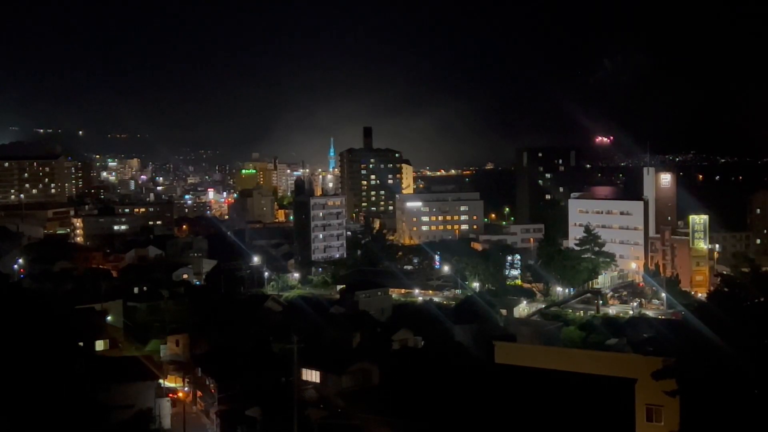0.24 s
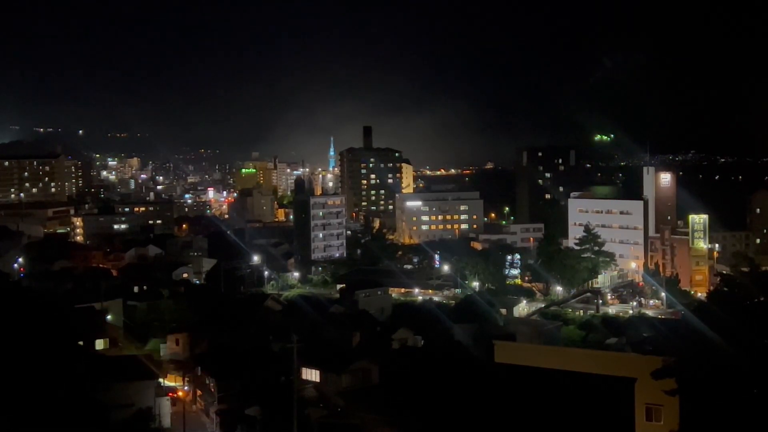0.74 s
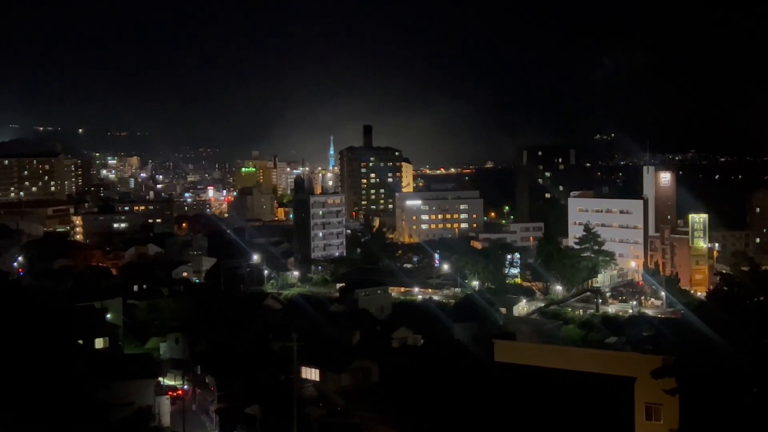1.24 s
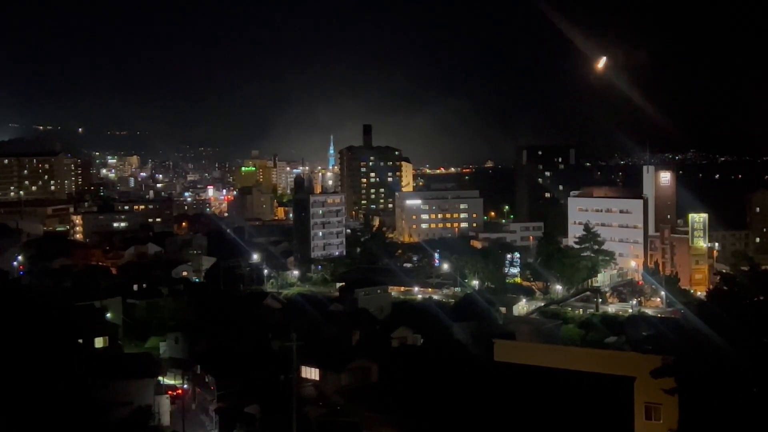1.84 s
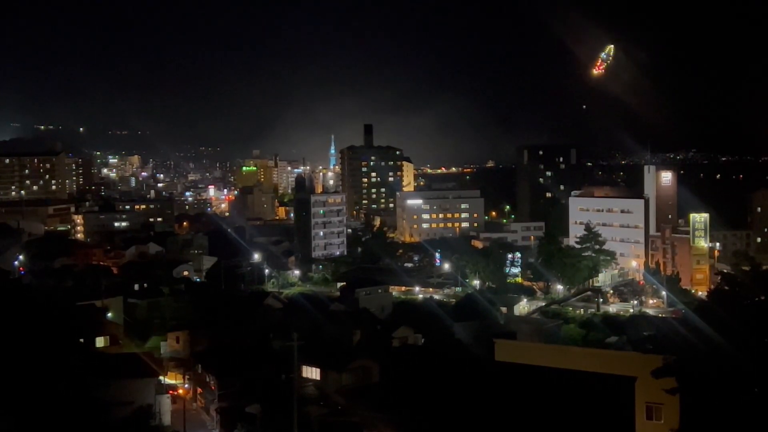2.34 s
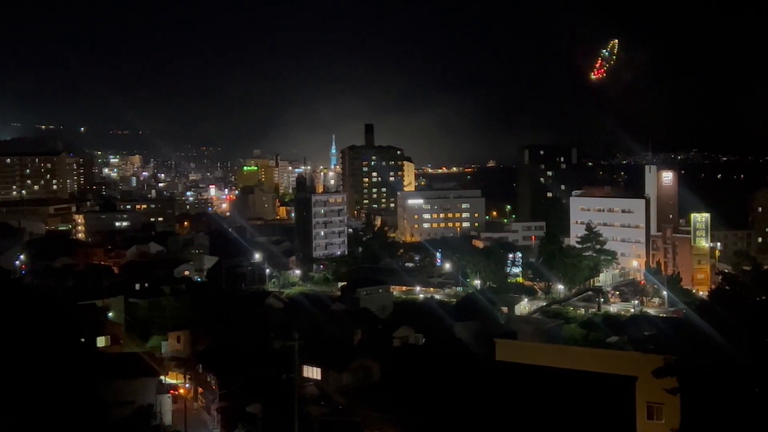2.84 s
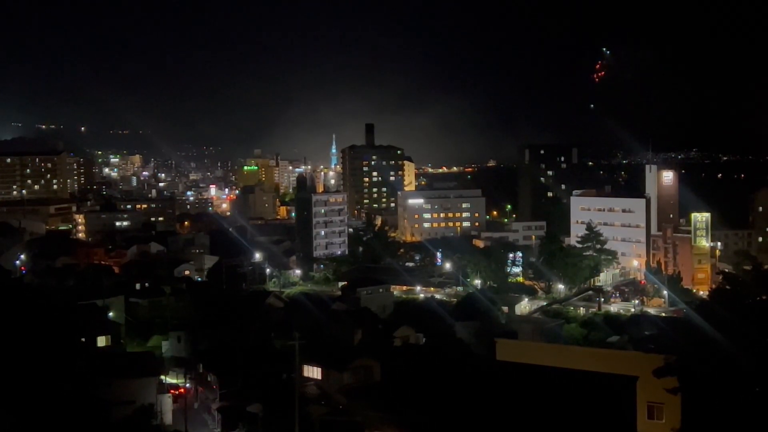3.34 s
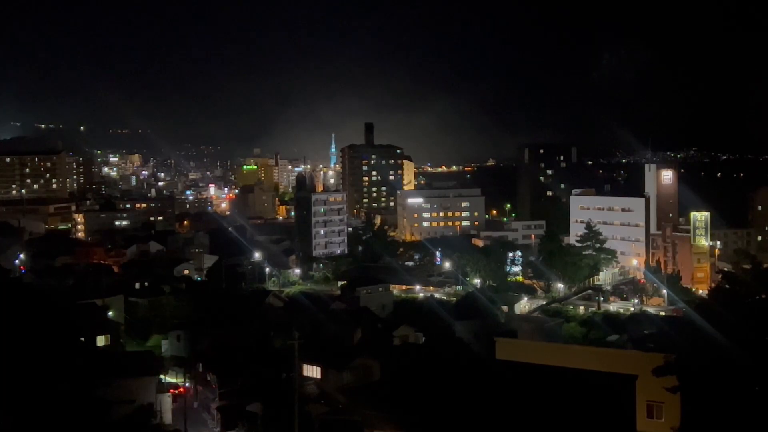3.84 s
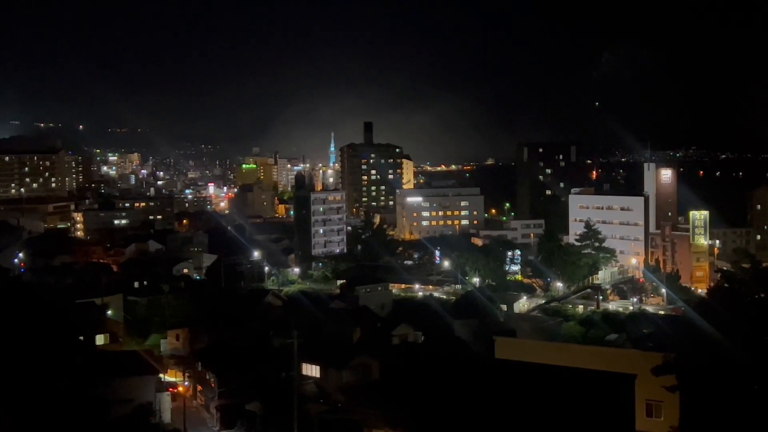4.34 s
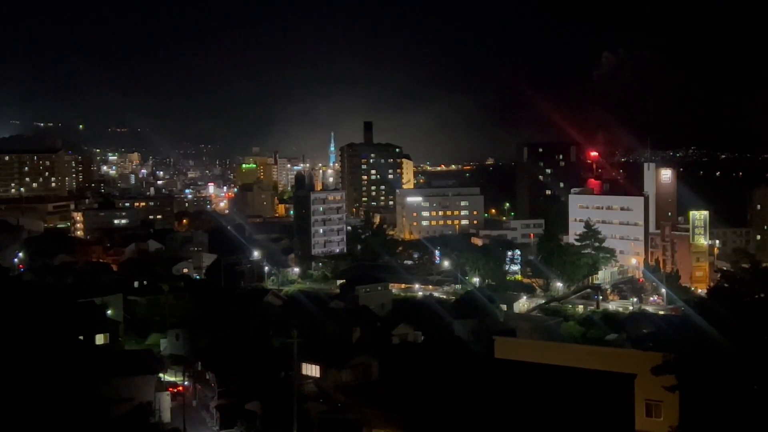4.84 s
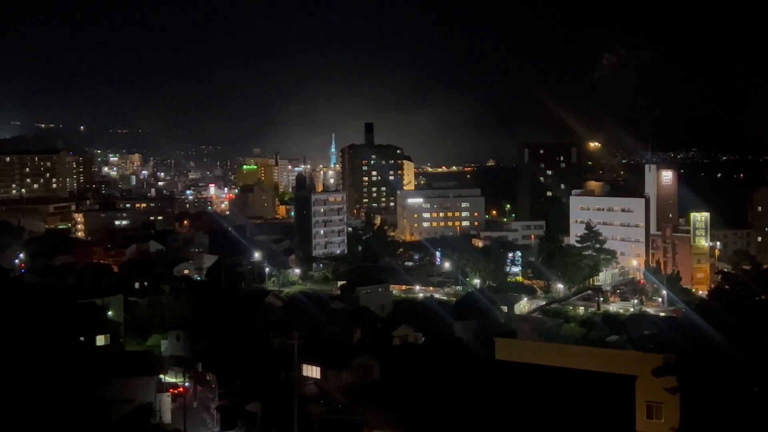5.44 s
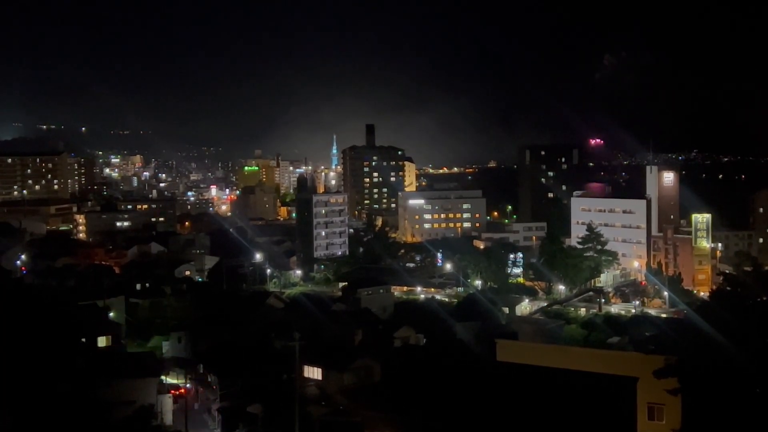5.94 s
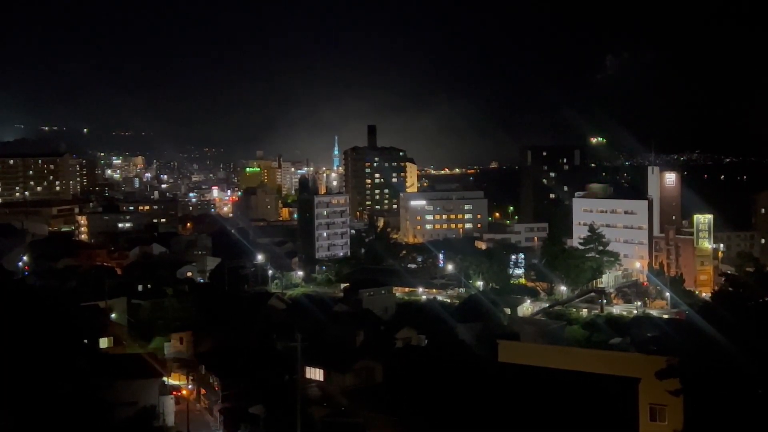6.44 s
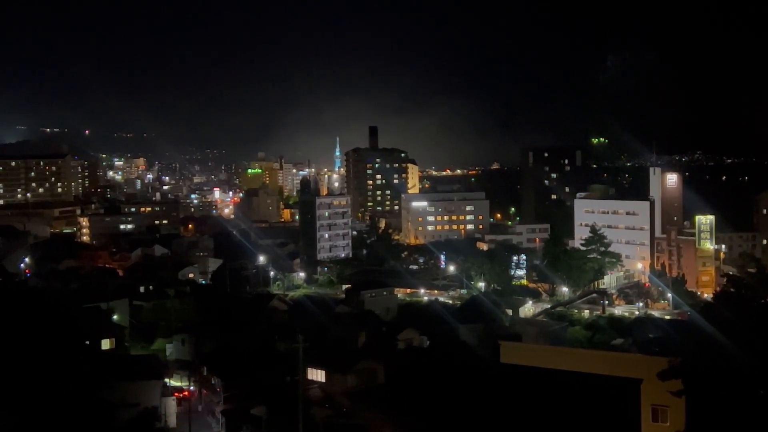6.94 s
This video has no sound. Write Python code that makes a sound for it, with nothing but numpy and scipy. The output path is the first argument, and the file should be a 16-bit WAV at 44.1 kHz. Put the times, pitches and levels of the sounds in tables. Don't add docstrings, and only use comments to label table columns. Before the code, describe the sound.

Two distant firework booms crack and roll in long echoes over a night city, above a steady katydid rasp, low hum and soft traffic.

```python
import sys
import numpy as np
from scipy import signal
from scipy.fft import rfft, irfft, next_fast_len
from scipy.io import wavfile
from scipy.ndimage import map_coordinates

SR = 44100
rng = np.random.default_rng(int(sys.argv[2]) if len(sys.argv) > 2 else 0)


def output_pcm(signal):
    pcm = np.clip(np.atleast_2d(signal).T, -1, 1) * 32767
    wavfile.write(sys.argv[1], SR, np.round(pcm).astype(np.int16))


def magnitude_from_level(level_db):
    exponent = np.asarray(level_db, float) / 20
    return 10 ** exponent


N = 317079
T = np.arange(N) / SR

# (time [s], peak [dB], length [ms], street ring [dB])
WALL_ECHOES = [(1.55, -38, 0.63, -9), (1.563, -33.5, 3.1, 14.5), (1.664, -35, 1.1, -15),
               (1.668, -33, 1.3, -9), (1.6708, -31, 3.3, 9), (1.6965, -30.5, 0.93, -9),
               (1.8768, -33, 0.62, -12), (1.9948, -38, 0.78, 11), (2.0968, -41, 0.44, -9),
               (2.1017, -34.5, 0.64, -7), (3.037, -42.5, 2.3, 9), (3.061, -39.5, 3, 4), (3.1, -38, 3.2, -1),
               (6.632, -31, .9, -10), (6.733, -32.5, 2.7, -6), (6.7679, -32, 0.57, 12),
               (7.156, -34, 0.67, -10), (7.1601, -31.5, 2.8, -2)]


def unit(x):
    return x / np.sqrt(np.mean(x ** 2) + 1e-20)


def curves(rows):
    s, *columns = np.transpose(rows)
    return [np.interp(T, s, column) for column in columns]


def wobble(rate):
    knots = rng.standard_normal(int(N * rate / SR) + 4)
    return map_coordinates(knots, [T * rate])


def filtered(x, response):
    m = next_fast_len(N + SR // 2)
    spectrum = rfft(x, m) * response(np.fft.rfftfreq(m, 1 / SR))
    return irfft(spectrum, m)[:N]


def coloured(x, points):
    hz, db = np.transpose(points)
    return unit(filtered(x, lambda f: magnitude_from_level(np.interp(np.log(f + 1), np.log(hz), db, -120, -120))))


def resonance(f, hz, width):
    return 1j * f * width / (hz * hz - f * f + 1j * f * width)


def grainy(spread_db, rate):
    return rng.standard_normal(N) * magnitude_from_level(spread_db * wobble(rate))


def dying(starts, t60):
    kicks = np.zeros(N)
    for s, db in starts:
        kicks[int(s * SR) + 1] += magnitude_from_level(2 * db)
    return signal.lfilter([1], [1, -magnitude_from_level(-120 / t60 / SR)], kicks)


def blasts():
    # (time [s], peak [dB], length [ms], rise [ms], street ring [dB])
    pushes = [
        (1.4333, -19, 12, .3, -20),
        (1.4421, -11.5, 7, 2.4, -10),
        (1.4498, -14.5, 6, 2, 0),
        (6.4881, -10.3, 4.6, .55, -20),
        (6.4948, -10, 3.6, 1.4, 3),
    ]
    # (time [s], peak [dB], length [ms], rise [ms])
    pulls = [
        (1.4306, -19, 7, 2.6),
        (1.4368, -24, 1.6, .3),
        (6.485, -14.5, 12, 1.5),
        (6.4875, -8.8, .65, .26),
        (6.4916, -23, .6, .25),
    ]
    # (frequency [Hz], width [Hz])
    street = (196, 33)
    ground_hz = 95
    air_hz = 4800

    fronts = [(1, *row) for row in pushes]
    fronts += [(-1, *row, -20) for row in pulls]
    for s, db, length, ring_db in WALL_ECHOES:
        rise = .42 * length ** 1.05
        fronts.append((1, s, db, length, rise, ring_db))

    push, boom = np.zeros(N + SR), np.zeros(N + SR)
    ms = np.arange(SR // 10) / SR * 1000
    for sign, s, db, length, rise, ring_db in fronts:
        front = (1 - ms / length) * np.exp(-ms / length) * (1 - np.exp(-(ms / rise) ** 2))
        front *= sign * magnitude_from_level(db) / front.max()
        first = round(s * SR)
        push[first:][:len(ms)] += front
        boom[first:][:len(ms)] += front * magnitude_from_level(ring_db)

    def path(f):
        air = 1 / (1 + 1.5j * f / air_hz - (f / air_hz) ** 2) ** 2
        ground = 1j * f / ground_hz * resonance(f, ground_hz, ground_hz * 1.2) / 1.2
        return air * ground

    ringing = filtered(boom[:N], lambda f: resonance(f, *street))
    return filtered(push[:N] + ringing, path)


def roll():
    # (time [s], near walls [dB], far city [dB], brightness [dB a layer])
    bursts = [
        (1.432, -24, -40.5, -1.5),
        (6.487, -21, -41.5, 1),
    ]
    # (near level [dB], near t60 [s], far level [dB], far t60 [s], build-up [s])
    layers = [
        (0.5, 0.23, -1, 4.34, 0.042),
        (7, 0.074, -10, 2.7, .027),
        (-18.5, 0.14, -15.5, 1.93, 0.0022),
        (-28, .06, -24, 0.68, 0.0027),
    ]
    # (frequency [Hz], level [dB])
    boom_tone = [(40, -39), (90, -5.5), (140, 2), (200, -1), (300, -11.5), (500, -16.5)]
    rattle_tone = [(200, -33), (350, 0.5), (500, 1), (800, -2.5), (1200, -10.5), (1800, -43)]
    hiss_tone = [(800, -12), (1300, 2.5), (2200, -6.5), (3300, -16.5), (4500, -36), (6000, -60)]
    crack_tone = [(1500, -25), (2500, 0), (4300, -5), (5500, -12), (6500, -48)]
    tones = boom_tone, rattle_tone, hiss_tone, crack_tone
    trails_db = -11.5, -21, -29, -47

    walls = [echo[:2] for echo in WALL_ECHOES]
    trail = abs(dying(walls, 0.14) - dying(walls, .02))
    out = np.zeros(N)
    for k, (tone, layer, trail_db) in enumerate(zip(tones, layers, trails_db)):
        near_db, near_s, far_db, far_s, build = layer
        power = dying([(s, near + near_db + k * bright) for s, near, far, bright in bursts], near_s)
        power += dying([(s, far + far_db + k * bright) for s, near, far, bright in bursts], far_s)
        power += trail * magnitude_from_level(2 * trail_db)
        for s, *_ in bursts:
            power *= np.where(T < s, 1, np.clip((T - s) / build, 0, 1) ** 4)
        out += np.sqrt(power) * coloured(grainy(spread_db=2.5, rate=90), tone)
    return out


def thuds():
    # (time [s], peak [dB], length [ms])
    mortars = [
        (2.124, -35, 12),
        (4.012, -39, 12),
    ]
    out = np.zeros(N)
    for s, db, ms in mortars:
        x = (T - s) * 2000 / ms - 1
        out -= magnitude_from_level(db) * (1 - x ** 2) * np.exp(-x ** 2 / 2)
    return out


def katydid():
    # (time [s], level [dB])
    song_levels = [(0, -57), (1, -57), (2, -57.5), (3, -58), (4, -58.5), (5, -58.5), (6, -58), (7.19, -57)]
    # (frequency [Hz], width [Hz], level [dB])
    wing_modes = [(8650, 550, 4), (9230, 430, 5), (9940, 870, 2), (11380, 1350, -6), (13000, 580, -8),
                  (13900, 480, -7), (15300, 1600, -11)]
    # (rest [dB], full at [share of stroke], held to [share],
    # sag [dB], let go at [share], level then [dB])
    low_stroke = (-16, 0.41, .57, -3.5, 0.61, -6)
    high_stroke = (-13.5, .39, .63, -4, .69, -12.5)

    share = (.13 + 26.105 * T - .0215 * T ** 2 / 2 + .025 * wobble(4.8)) % 1
    vigour = 1 + .06 * wobble(30)
    teeth = np.cumsum(572 * (1 + 0.061 * wobble(60))) / SR
    clicks = unit(np.diff(np.floor(teeth), prepend=0) * magnitude_from_level(2.6 * rng.standard_normal(N)))
    blur = magnitude_from_level(-5.0) * rng.standard_normal(N)

    def wing(f, modes):
        edge = (1j * f / 8300 * resonance(f, 8210, 5140)) ** 4
        return edge * sum((-1) ** k * magnitude_from_level(db) * resonance(f, hz, w) for k, (hz, w, db) in enumerate(modes))

    song = 0
    for modes, stroke, blur_db in ((wing_modes[:4], low_stroke, -1.5), (wing_modes[4:], high_stroke, 5)):
        rest_db, full, held, sag_db, loose, loose_db = stroke
        press_db = np.interp(share, [0, full, held, loose, 1], [rest_db, 0, sag_db, loose_db, rest_db])
        press_db = vigour * press_db
        drive = clicks * magnitude_from_level(1.45 * press_db) + blur * magnitude_from_level(0.83 * press_db + blur_db)
        song += filtered(drive, lambda f: wing(f, modes))
    return magnitude_from_level(curves(song_levels)[0] + 0.51 * wobble(35)) * unit(song)


def compressor():
    # (time [s], frequency [Hz], level [dB], fall to the second multiple [dB])
    shaft = [(0, 68, -55.5, -2.5), (.6, 68.1, -44.5, 10), (1, 67.9, -50.5, 4.5), (1.3, 67.8, -52.5, 2),
             (1.7, 68, -47.5, 18), (2.3, 68.1, -53, 0), (3.05, 68.15, -49.5, 6.5), (3.15, 67.34, -51.5, 6),
             (3.6, 66.7, -49.5, 6.5), (4, 66.63, -48.5, 5.5), (4.5, 66.6, -48.5, 5.5),
             (5.05, 66.86, -50, 6), (5.45, 67.1, -56, 6), (6.1, 66.35, -52.5, 5.5), (7.19, 65.1, -52.5, 15)]
    hz, db, fall_db = curves(shaft)
    third_db = db - 0.74 * fall_db - 4 - 1.6 * T
    turn = 2 * np.pi * np.cumsum(hz + .4 * wobble(8)) / SR
    out = np.zeros(N)
    for order, order_db in enumerate((db, db - fall_db, third_db), 1):
        size = np.sqrt(2) * magnitude_from_level(order_db + 1.6 * wobble(6.3))
        out += size * np.cos(order * turn + 0.33 * wobble(6.7))
    return out


def brakes():
    # (frequency [Hz], level at start [dB], t60 [s], roughness [Hz])
    whistles = [
        (7469, -63, 2.1, 3),
        (5276, -76, 4.5, 4),
        (5430, -80, 4, 35),
    ]
    out = np.zeros(N)
    for hz, db, t60, rough in whistles:
        size = np.sqrt(2) * magnitude_from_level(db - 60 * T / t60 - 40 * T ** 4 + 1.5 * wobble(20))
        out += size * np.sin(2 * np.pi * np.cumsum(hz + rough * wobble(250)) / SR)
    return out


def far_insect():
    # (time [s], level [dB])
    swell = [
        (0, -73),
        (3.1, -83),
        (3.75, -65),
        (4.3, -64.5),
        (5.2, -73.5),
        (7.19, -78),
    ]
    # (frequency [Hz], level [dB per Hz])
    rasp_tone = [(6000, -30), (6800, -6), (7500, -2.5), (8500, -6), (10000, 0), (12000, -25)]
    return magnitude_from_level(curves(swell)[0]) * coloured(grainy(spread_db=0.0, rate=69), rasp_tone)


def traffic():
    # (time [s], level [dB])
    flow = [(0, -61.5), (1.3, -61), (1.7, -61), (2.3, -60.5), (3.2, -60), (4.2, -59.5), (5.04, -58.5),
            (5.54, -60), (6.5, -58.5), (7.19, -56.5)]
    # (frequency [Hz], level [dB per Hz])
    wash_tone = [(200, -12), (300, 2), (390, -1.5), (660, 0.5), (1000, -1.5), (1500, -8), (2200, -17.5),
                 (3500, -27)]
    rumble_tone = [(15, -11), (30, 5.5), (50, -4), (90, 1.5), (120, -2.5), (250, -1), (350, -12.5),
                   (500, -35.5)]
    spray_tone = [(1000, -16), (1800, -5.5), (3000, -8.5), (4500, -11.5), (6000, -15.5), (8000, -5.5),
                  (12000, -25), (15800, -17)]
    # (time [s], length [s], level [dB])
    passing_car = (3.52, .2, 2.7)
    # (time [s], length [s], level [dB], frequency [Hz], width [Hz])
    load_groan = (.49, .12, -65, 600, 90)

    wash_db, = curves(flow)
    swell_db = wash_db - wash_db.mean()
    wash = magnitude_from_level(wash_db + .6 * wobble(3.23)) * coloured(grainy(spread_db=0.3, rate=25), wash_tone)

    s, length, car_db = passing_car
    spray_db = -71 + 0.079 * swell_db + car_db * np.exp(-((T - s) / length) ** 2)
    spray = magnitude_from_level(spray_db) * coloured(grainy(spread_db=0.66, rate=20), spray_tone)

    rumble_db = -56 + 0.98 * swell_db + 0.33 * wobble(2.995)
    rumble = magnitude_from_level(rumble_db) * coloured(grainy(spread_db=2.0, rate=11), rumble_tone)

    s, length, db, hz, width = load_groan
    groan = unit(filtered(rng.standard_normal(N), lambda f: resonance(f, hz, width) ** 2))
    groan *= magnitude_from_level(db) * np.exp(-((T - s) / length) ** 2)
    return wash + spray + rumble + groan


def scene():
    fireworks = blasts() + roll() + thuds()
    insects = katydid() + far_insect()
    return (fireworks + insects + compressor() + brakes() + traffic())[None]


def band_limit(x):
    return signal.sosfilt(signal.butter(12, 15950, fs=SR, output="sos"), x)


def record(dry):
    heard = filtered(dry[0], lambda f: 1j * f / (28 + 1j * f) * (f < 15850))
    return band_limit(heard[None])


dry = scene()
out = record(dry)
output_pcm(out)
```